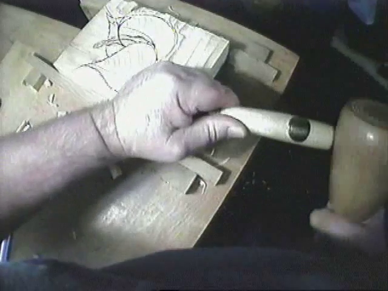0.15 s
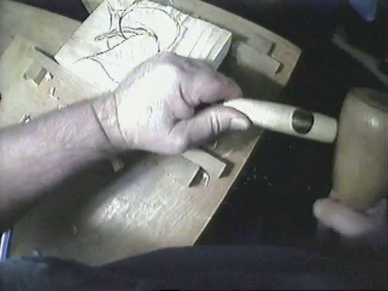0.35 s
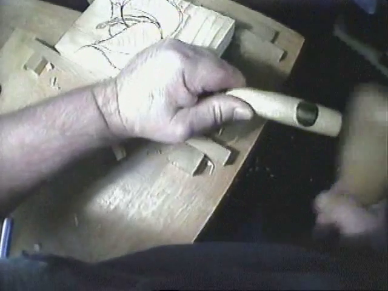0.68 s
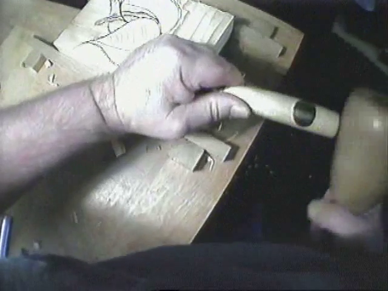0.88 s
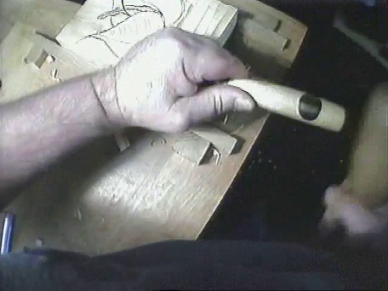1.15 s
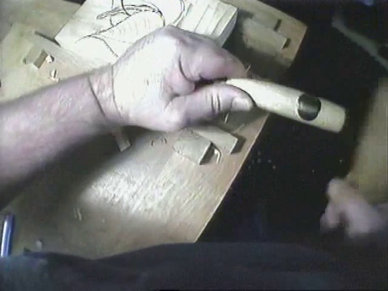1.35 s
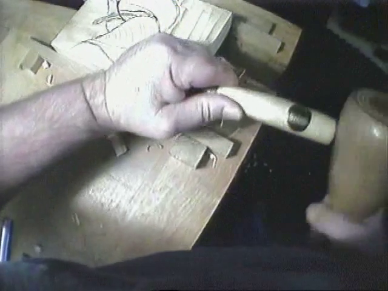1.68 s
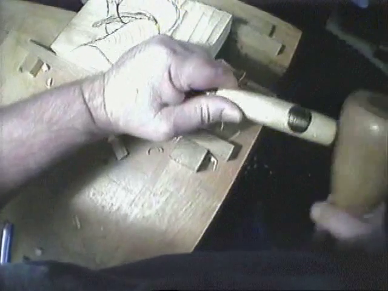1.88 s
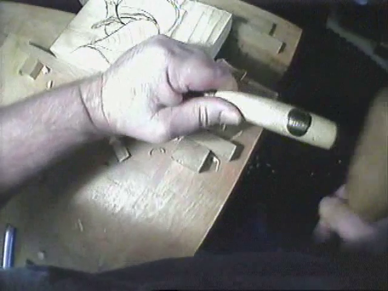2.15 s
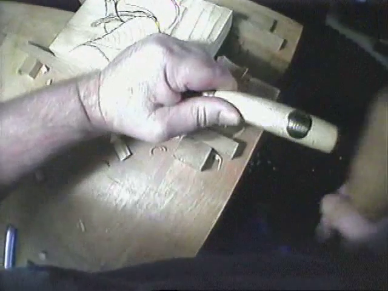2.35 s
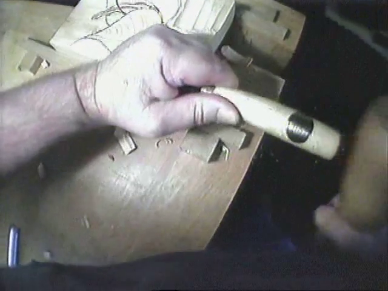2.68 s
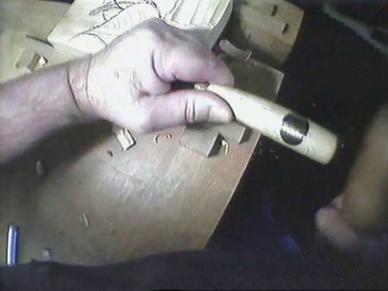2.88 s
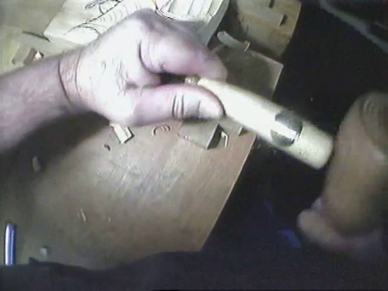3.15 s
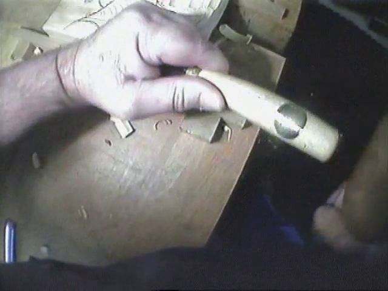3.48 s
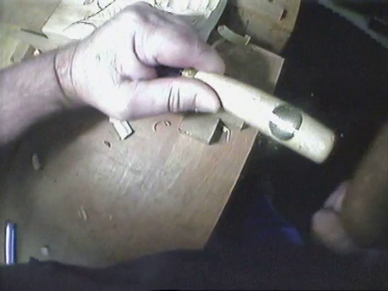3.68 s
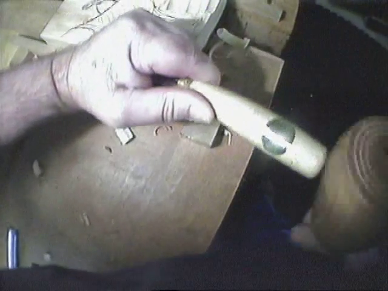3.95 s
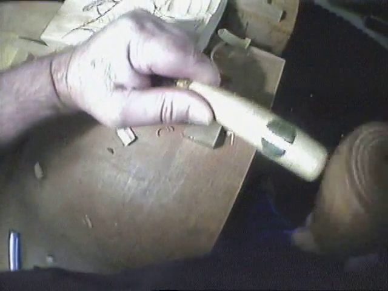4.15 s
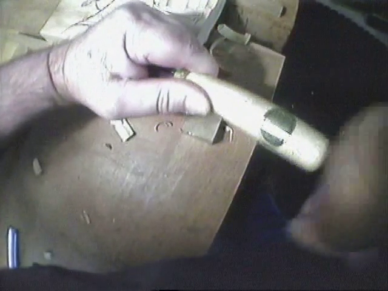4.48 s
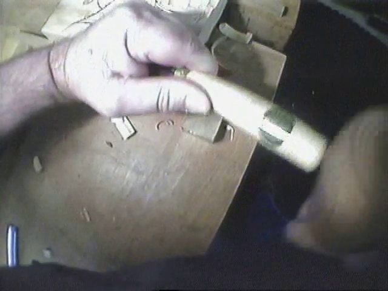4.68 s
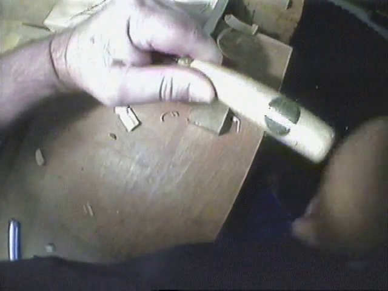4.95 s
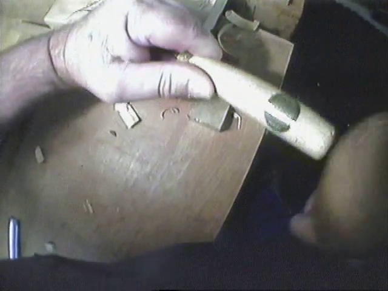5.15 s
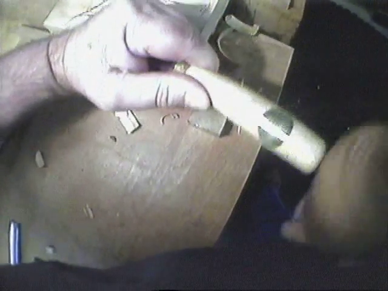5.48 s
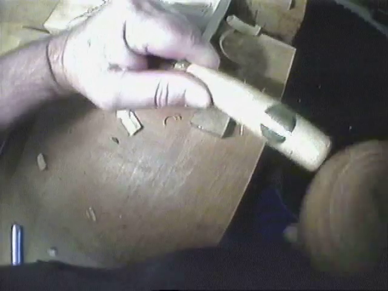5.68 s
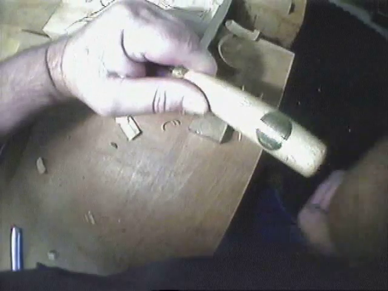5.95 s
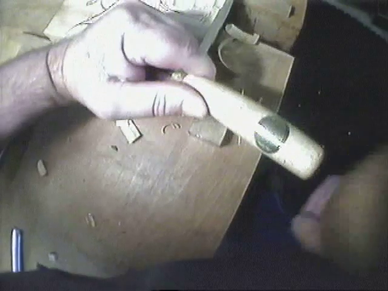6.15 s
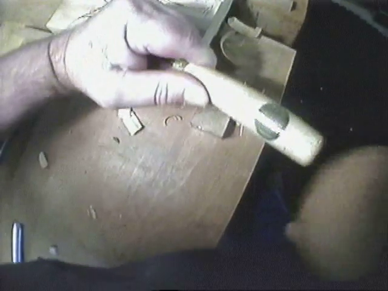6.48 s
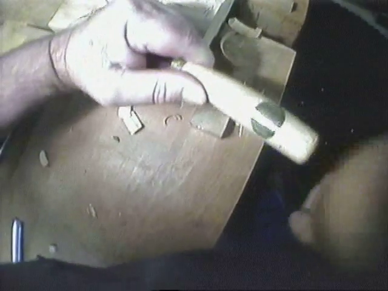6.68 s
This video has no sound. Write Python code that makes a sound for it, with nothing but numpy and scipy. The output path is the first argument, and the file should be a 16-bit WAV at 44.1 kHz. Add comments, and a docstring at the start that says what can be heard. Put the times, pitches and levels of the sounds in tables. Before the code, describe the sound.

A wooden mallet taps the handle of a carving gouge about five times a second, without a break. Each blow is a dry knock with the crisp bite of the blade on top and a low ring from the block and bench. The taps soften briefly, then firm up, and the ring changes as the cut curves. One tiny chip snaps midway. It is heard close up in a small workshop with faint rumble and hiss.

```python
"""A small workshop: a wooden mallet taps the handle of a carving gouge about five times a second.
Each blow is a dry knock of handle and mallet with a crisp bite of the edge on top; it drives block
and bench into a low ring and fills the room. The cut curves round, so the push meets the bench from
a new side and the ring changes. One chip snaps midway; a quiet rumble and hiss lie underneath."""
import sys
import numpy as np
from scipy import signal
from scipy.fft import rfft, irfft
from scipy.io import wavfile

SR = 44100
rng = np.random.default_rng(int(sys.argv[2]) if len(sys.argv) > 2 else 0)


def generate_wav(signal):
    """Clip the signal to [-1, 1] and save it as 16-bit WAV at the path in sys.argv[1]."""
    frames = np.transpose(np.atleast_2d(signal))
    scaled = np.clip(frames, -1, 1) * 32767
    pcm = np.round(scaled).astype(np.int16)
    wavfile.write(sys.argv[1], SR, pcm)


N = 300938
RING_SIZE = 24000   # samples in one blow and its tail
AGE = np.arange(RING_SIZE) / SR
ROOM_T60_S, TREBLE_T60_S = 0.3, 0.26

# mallet blows, each level taken against its column's mean: t/s, crack/dB, body/dB
MALLET_BLOWS = [(0.0899, -14.5, -23), (0.2769, -16.5, -23), (0.4688, -14.5, -23.5), (0.6526, -14.5, -23),
                (0.8351, -14.5, -24.5), (1.0227, -16, -24.5), (1.2134, -16, -24.5), (1.4009, -15.5, -23),
                (1.5938, -17.5, -23.5), (1.781, -16.5, -25.5), (1.9716, -17, -24), (2.16, -19.5, -26),
                (2.3548, -21, -26), (2.5369, -21.5, -28), (2.7273, -22.5, -29.5), (2.9222, -22, -27.5),
                (3.1159, -17, -27.5), (3.3067, -19, -25), (3.4987, -16, -26), (3.687, -16, -24),
                (3.8785, -17, -24.5), (4.0671, -16.5, -24.5), (4.261, -21.5, -23.5), (4.4467, -18.5, -22.5),
                (4.6426, -19, -22.5), (4.8396, -18, -23.5), (5.036, -18.5, -23.5), (5.229, -19.5, -24),
                (5.4223, -21, -25), (5.6071, -20, -24.5), (5.8009, -20.5, -24.5), (6.0024, -20, -24),
                (6.1965, -18, -23.5), (6.3839, -18, -23.5), (6.57, -17, -23.5), (6.758, -16.5, -25)]
# course of the cut: t/s, turn round the curve (0-1), bench-top thud/dB, handle knock/dB
CUT_PATH = [(0, 0.05, 1, -3), (0.999, 0.04, -0.5, 2), (1.8, 0.3, 1, 2), (2.3, 0.55, -4.5, 3.5),
            (2.7, 0.82, 1, 2), (3.9, 0.71, -1, 0.8), (5.2, 0.92, 2.5, -3), (6.0, 0.95, -1.5, 0.7),
            (6.8, 0.89, -8.5, 6)]
# knock, crack and tick bands, coloured by how the mallet face seats: low f/Hz, high f/Hz
COLOUR_BANDS = [(1500, 2100), (2400, 4600), (6500, 16000)]
# a square hit is brighter than a glancing one; lift per dB of extra crack: knock/dB, crack/dB, tick/dB
SQUARE_HIT_GAINS = (0.38, 0.85, 0.28)
# modes of handle and mallet, damped by the hands, at mid-curve:
# f/Hz, t60/s, left level/dB, right level/dB, onset/s, left lag/s, gain over the whole curve/dB
HANDLE_MODES = [(474, 0.0025, -20.5, -26.5, 0.0042, 0, 4), (838, 0.014, -16, -24.5, 0.0003, 0.00063, 7),
                (1127, 0.027, -29.5, -19, 0.000051, 0.0022, 10),
                (1730, 0.0085, -27.5, -21.5, 0.00071, 0.006, -18),
                (2333, 0.01, -16.5, -18, 0.00066, 0.000397, 1),
                (3405, 0.006, -18.5, -20.5, 0.0012, 0.0024, 2.5),
                (4420, 0.012, -42, -24.5, 0.0007, 0.00061, -1.5),
                (6930, 0.0031, -26, -31, 0.00018, 0.0005794, -3),
                (8360, 0.0096, -48.5, -38.5, 0, 0.000484, 4),
                (11800, 0.0025, -32.5, -39, 0.0022, 0.000023, 4)]
# modes of block and bench:
# f/Hz, t60/s, level at turn 0/dB, level at turn 1/dB, left minus right/dB, sign of first swing
BENCH_RING = [(58.4, 0.39, -37.5, -34.5, -10.5, -1), (79.6, 0.27, -42, -39, -3, -1),
              (112.5, 0.4, -44, -53.5, -21, 1), (140.7, 0.2, -35, -41.5, -12, 1),
              (166.1, 0.22, -31, -41.5, -11, -1), (194.8, 0.39, -39.5, -62.5, 8, 1),
              (217.3, 0.53, -41, -50, -5, -1), (258.3, 0.4, -38.5, -53, -4, 1),
              (279.9, 0.47, -40, -51, -17, -1), (345, 0.064, -29, -33.5, 1, 1),
              (386, 0.14, -40, -24, -3.5, -1), (417.6, 0.2, -40, -49, 20, 1), (478, 0.31, -41, -45, -16, 1),
              (506.2, 0.19, -39, -32, -14.5, 1), (536.5, 0.063, -31, -25, -0.5, -1),
              (631.5, 0.12, -39, -39, -2.5, -1), (709, 0.28, -44, -30, -7, -1),
              (758, 0.26, -32, -38.5, -16.5, 1), (784, 0.26, -34, -40, -8.5, -1),
              (888, 0.31, -38.5, -39.5, -3, 1), (944, 0.22, -42, -39, -5, 1),
              (1131, 0.2, -34, -54, -32, -1), (1247, 0.24, -34.5, -58, 5, 1), (1316, 0.12, -44, -33, 23, 1)]
# phase lag of the bench's ring on the left: f/Hz, lag/rad
BENCH_LEFT_LAG = [(60, -0.5), (330, -0.5), (400, 0.08), (600, 1.5), (900, 5), (1300, 3.5)]
# chip snap: t/s, level before filtering/dB
CHIP_SNAPS = [(3.9735, -43)]
# first reflections off the carver and the things on the bench: delay/s, left level/dB, right level/dB
NEAR_ECHOES = [(0.0057, -22, -20), (0.0102, -15.5, -23)]
# colour of the reverb: f/Hz, level/dB
REVERB_COLOUR = [(50, -37), (200, -27), (400, -18.5), (800, -16), (1100, -19), (1700, -22.5), (2500, -22),
                 (3300, -27), (4300, -30.5), (5500, -39), (7000, -47), (8500, -53.5), (12000, -55),
                 (16000, -71)]
# balance of the reverb: f/Hz, left minus right/dB
REVERB_PAN = [(100, -7), (1000, -3.5), (2000, -2), (4000, -2.5)]
# rumble and hiss of the quiet workshop: f/Hz, level/dB
ROOM_TONE = [(15, -25), (30, -31.5), (60, -26), (120, -38), (300, -44.5), (1000, -57), (3000, -61),
             (7000, -72.5), (12000, -74.5), (16000, -79)]


def carving(level_db=-0.64, body_follows=0.57, bench_delay_s=0.00034, room_delay_s=0.002232):
    """Every blow sounds gouge, bench and room in turn, coloured by how squarely the mallet lands."""
    blows, out = np.array(MALLET_BLOWS), np.zeros((2, N))
    beat_s = np.median(np.diff(blows[:, 0]))
    lead_in = blows[0] - [beat_s, 0, 0]   # the tapping is already under way
    times, crack_db, body_db = np.vstack([lead_in, blows]).T
    crack_db = crack_db - crack_db.mean()
    body_db = body_follows * (body_db - body_db.mean())
    cut_s, *columns = np.transpose(CUT_PATH)
    turn, thud_db, knock_db = [np.interp(times, cut_s, column) for column in columns]
    gouge = mallet_clack(turn) + handle_knock(turn) + edge_bite(len(times))
    ring = delayed(bench_ring(turn, thud_db), bench_delay_s)
    reverb = delayed(room_reverb(len(times)), room_delay_s)
    hits = gouge + near_echoes(gouge) + ring + reverb + block_settle(turn)
    colours = hit_colour(crack_db - body_db, turn, knock_db)
    for s, strength_db, colour_db, hit in zip(times, body_db, colours, hits):
        for (low_hz, high_hz), lift_db in zip(COLOUR_BANDS, colour_db):
            hit = hit + (from_db(lift_db) - 1) * band(hit, low_hz, high_hz)
        add(out, s, from_db(level_db + strength_db) * hit)
    return out


def handle_knock(turn, vary_db=1.04, detune=0.036, slacken=0.028, bounce_s=0.001889, bounce_db=-14):
    """Handle and mallet ring briefly, right side first, and the knock bounces once off the bench top."""
    out, size = np.zeros((len(turn), 2, RING_SIZE)), SR // 20
    past_middle = turn[:, None, None] - .5
    pitch = 1 - slacken * past_middle   # sinks a little as the grip shifts round the curve
    for hz, t60, left_db, right_db, onset_s, lag_s, turn_db in HANDLE_MODES:
        arrival = AGE[:size] - np.array([[lag_s], [0]])
        grip, seat = rng.standard_normal((2, len(turn), 1, 1))
        mode_hz = hz * (pitch + detune * grip)
        gain = from_db(np.array([[left_db], [right_db]]) + turn_db * past_middle + vary_db * seat)
        for path_s, path_db in [(0, 0), (bounce_s, bounce_db)]:
            age = np.maximum(arrival - onset_s - path_s, 0)
            ring = np.sin(2 * np.pi * mode_hz * age) * fade(age, t60)
            out[:, :, :size] += gain * from_db(path_db) * ring
    return out


def mallet_clack(turn, start_hz=1380, end_hz=1140, width_s=0.00051, peak_s=0.001198, lag_s=0.00058):
    """Wood meets wood: a clack of about two cycles, right side first, lower as the cut comes round."""
    hz = (start_hz + turn * (end_hz - start_hz))[:, None, None]
    age = AGE - peak_s - np.array([[lag_s], [0]])
    pulse = np.cos(2 * np.pi * hz * age) * np.exp(-(age / width_s) ** 2)
    return from_db(-11) * panned(-10) * pulse


def hit_colour(extra_crack_db, turn, knock_db, crack_db=-0.54, tick_start_db=5, tick_end_db=-2.3):
    """Knock, crack and tick EQ in dB: the tick dulls round the curve; a square hit lifts all three."""
    tick_db = tick_start_db + turn * (tick_end_db - tick_start_db)
    base_db = np.column_stack([knock_db, np.full(len(turn), crack_db), tick_db])
    return base_db + np.outer(extra_crack_db, SQUARE_HIT_GAINS)


def edge_bite(count, snap_db=-36, snap_t60=0.0079, crunch_db=-35, crunch_t60=0.034, onset_s=0.00055):
    """The edge bites: a bright snap and a very short crunch of fibres, new with every blow."""
    burst = rng.standard_normal((count, 2, RING_SIZE)) * (AGE > onset_s)
    age = np.maximum(AGE - onset_s, 0)
    snap = from_db(snap_db) * band(burst * fade(age, snap_t60), 4100, 13600)
    crunch = from_db(crunch_db) * band(burst * fade(age, crunch_t60), 6000, 7300, order=2)
    return snap + crunch


def bench_ring(turn, thud_db, vary_db=2.13, attack_s=0.00034):
    """The blade pushes block and bench; the direction of the push decides which modes take the blow."""
    hz, t60, start_db, end_db, pan_db, swing = np.array(BENCH_RING).T
    top_modes = (hz > 100) & (hz < 340)   # the thud of the bench top
    mode_db = start_db + np.outer(turn, end_db - start_db) + np.outer(thud_db, top_modes)
    strength = np.sign(swing) * from_db(mode_db + vary_db * rng.standard_normal(mode_db.shape))
    phase = 2 * np.pi * np.outer(hz, AGE)
    envelope = fade(AGE, t60[:, None]) * (1 - np.exp(-AGE / attack_s))
    left_gain, right_gain = panned(pan_db)
    lag = at_hz(BENCH_LEFT_LAG, hz)[:, None]
    left = (strength * left_gain) @ (envelope * np.sin(phase - lag))
    right = (strength * right_gain) @ (envelope * np.sin(phase))
    return np.stack([left, right], axis=1)


def block_settle(turn, delay_s=0.081, hz=780, level_db=-42, swell_s=0.003):
    """A soft hollow after-knock as the block rocks back, growing as the push comes round."""
    swell = np.maximum(AGE - delay_s, 0) / swell_s
    knock = from_db(level_db) * swell * np.exp(1 - swell) * np.sin(2 * np.pi * hz * AGE)
    return turn[:, None, None] * knock * panned(-10)


def chip_snap(t60=0.034, tail_db=-22):
    """Fibres part with a tiny bright tick and a faint room tail."""
    out = np.zeros((2, N))
    envelope = fade(AGE, t60) + from_db(tail_db) * fade(AGE, ROOM_T60_S)
    for s, level_db in CHIP_SNAPS:
        burst = rng.standard_normal((2, RING_SIZE)) * envelope
        add(out, s, from_db(level_db) * band(burst, 5000, 7900, order=2))
    return out


def near_echoes(sound):
    """Two near surfaces throw the knock back."""
    return sum(from_db([[left_db], [right_db]]) * delayed(sound, delay_s)
               for delay_s, left_db, right_db in NEAR_ECHOES)


def room_reverb(count, renew_hz=6000, absorb_hz=4000, attack_s=0.00039):
    """Dense reflections, alike from blow to blow; as the hands move, short wavelengths change first."""
    hz = np.fft.rfftfreq(RING_SIZE, 1 / SR)
    kept = np.exp(-np.minimum(hz / renew_hz, 1))
    paths = rfft(rng.standard_normal((count, 2, RING_SIZE)))
    for k in range(1, count):
        paths[k] = kept * paths[k - 1] + np.sqrt(1 - kept ** 2) * paths[k]
    paths = paths * from_db(at_hz(REVERB_COLOUR, hz)) * panned(at_hz(REVERB_PAN, hz))
    treble = hz ** 2 / (hz ** 2 + absorb_hz ** 2)   # the walls swallow this share sooner
    warm_tail = irfft(paths * (1 - treble)) * fade(AGE, ROOM_T60_S)
    bright_tail = irfft(paths * treble) * fade(AGE, TREBLE_T60_S)
    return (warm_tail + bright_tail) * (1 - np.exp(-(AGE / attack_s) ** 2))


def room_tone(shared_below_hz=250):
    """A steady bed: rumble partly shared by both sides and leaning right, hiss spread wide."""
    hz = np.fft.rfftfreq(N, 1 / SR)
    shared, own = rfft(rng.standard_normal(N)), rfft(rng.standard_normal((2, N)))
    alike = .65 / (1 + (hz / shared_below_hz) ** 2)
    noise = np.sqrt(alike) * shared + np.sqrt(1 - alike) * own
    return irfft(noise * from_db(at_hz(ROOM_TONE, hz)) * panned(-8.0 * alike), N)


def from_db(db):
    """Decibels to gain."""
    return 10 ** (np.asarray(db) / 20)


def at_hz(points, hz):
    """Read a table along a log-frequency axis."""
    points = np.array(points)
    return np.interp(np.log(np.maximum(hz, 1)), np.log(points[:, 0]), points[:, 1])


def panned(pan_db):
    """Constant-power left and right gains; positive dB leans left."""
    gains = from_db(np.array([pan_db, -pan_db]) / 2).reshape(2, -1)
    return gains / np.sqrt(np.mean(gains ** 2, axis=0))


def fade(age, t60):
    """Exponential decay by 60 dB in t60 seconds."""
    return np.exp(-np.log(1000) * age / t60)


def band(x, low_hz, high_hz, order=1):
    """Causal band-pass."""
    sos = signal.butter(order, [low_hz, min(high_hz, .45 * SR)], "band", fs=SR, output="sos")
    return signal.sosfilt(sos, x + 1e-18)


def delayed(sound, delay_s):
    """The same sound, arriving a moment later."""
    shift = np.exp(-2j * np.pi * np.fft.rfftfreq(RING_SIZE, 1 / SR) * delay_s)
    return irfft(rfft(sound) * shift) * (AGE > delay_s - 2 / SR)


def add(out, s, sound):
    """Mix a stereo sound in at time s."""
    start = int(round(s * SR))
    first, last = max(start, 0), min(start + sound.shape[1], N)
    if last > first:
        out[:, first:last] += sound[:, first - start:last - start]


def scene():
    """Carving over the quiet of the room."""
    return carving() + chip_snap() + room_tone()


def record(dry):
    """A steep high cut at 16.2 kHz."""
    return signal.sosfilt(signal.ellip(10, .1, 80, 16200, fs=SR, output="sos"), dry)


dry = scene()
out = record(dry)
generate_wav(out)
```